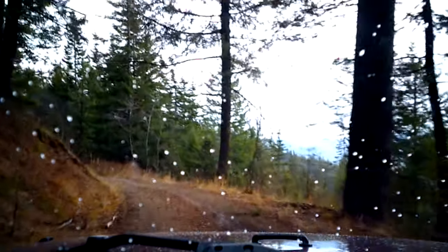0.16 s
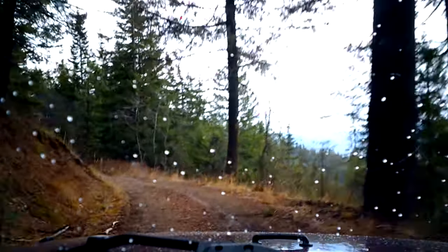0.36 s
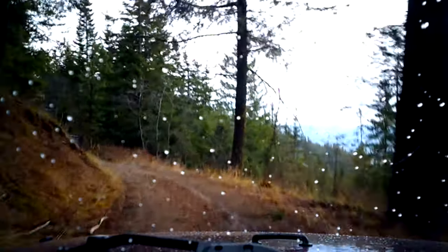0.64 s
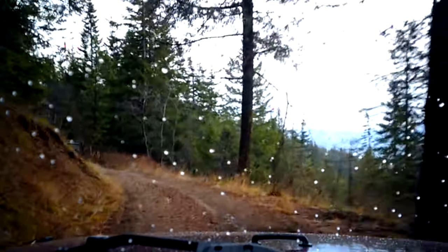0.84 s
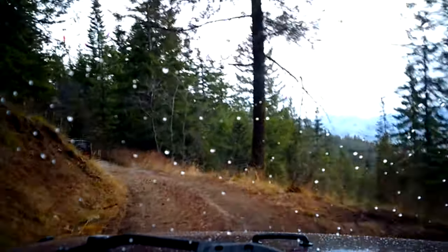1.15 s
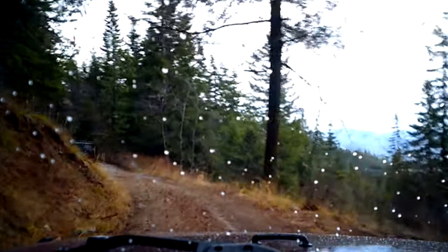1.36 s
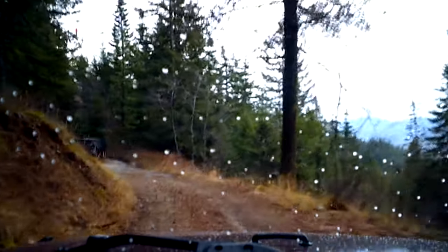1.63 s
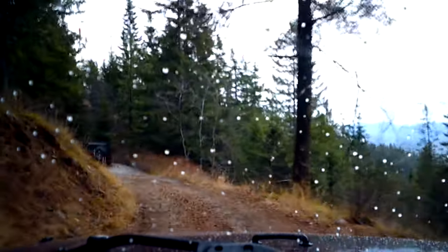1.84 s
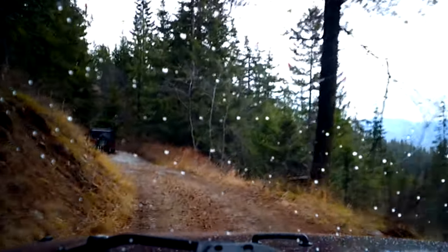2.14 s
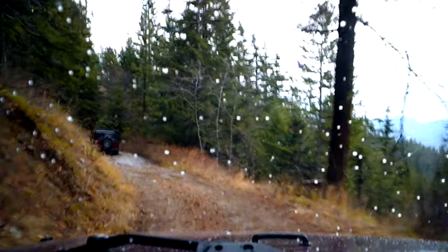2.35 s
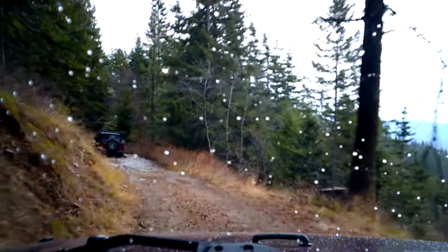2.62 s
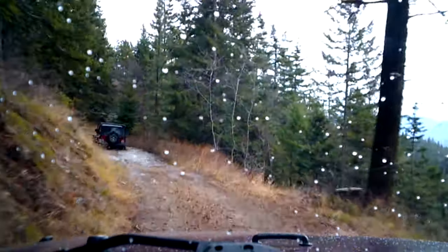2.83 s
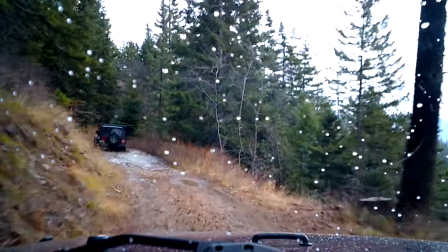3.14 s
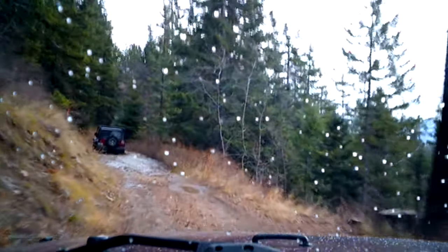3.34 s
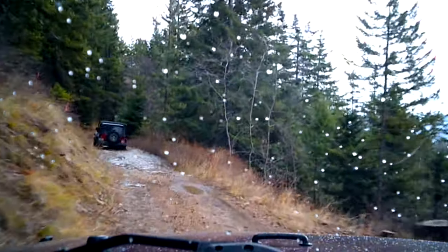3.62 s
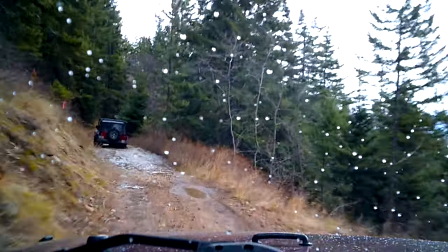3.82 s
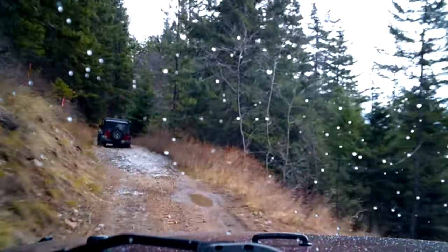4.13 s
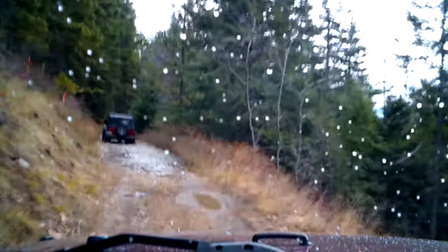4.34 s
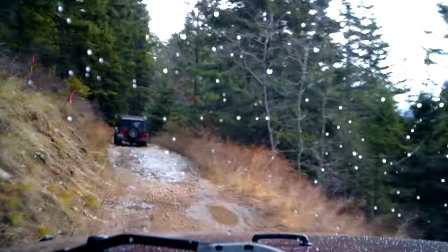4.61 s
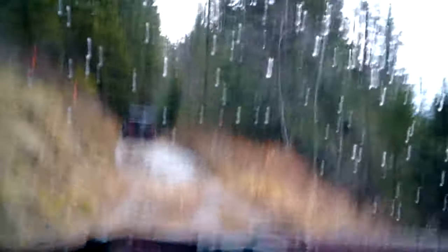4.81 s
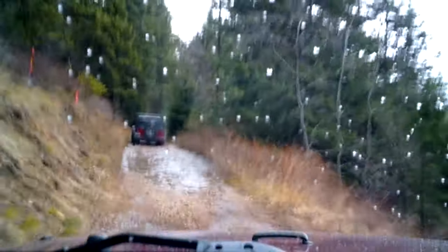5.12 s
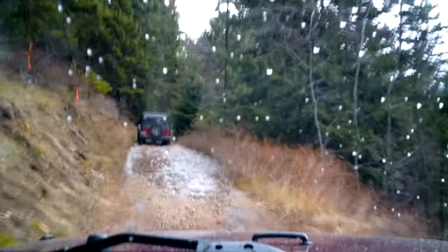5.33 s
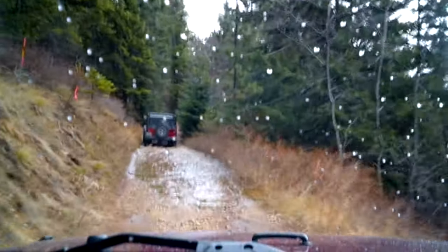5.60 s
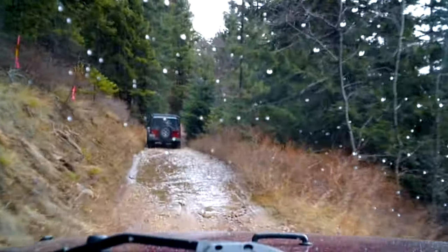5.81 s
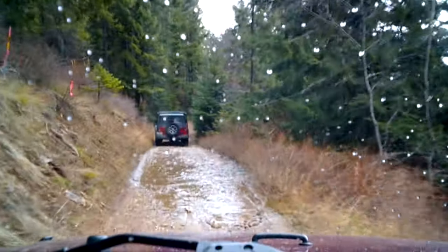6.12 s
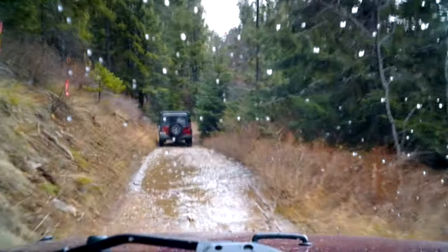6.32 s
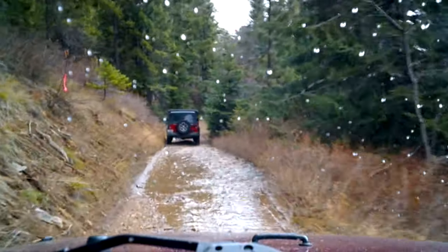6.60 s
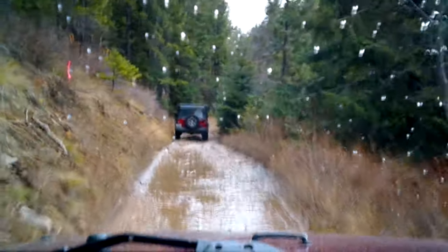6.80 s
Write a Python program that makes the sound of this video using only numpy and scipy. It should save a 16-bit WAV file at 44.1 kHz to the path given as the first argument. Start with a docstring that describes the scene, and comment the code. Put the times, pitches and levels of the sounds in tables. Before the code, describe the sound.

Close, boxy, distorted cab sound from a small camera microphone: wavering sub-bass throbs, muffled rolling rumble, dry plastic knocks and brief metallic rattles. Knocks come often at first, then thin out; a sharp bump comes before a half-second pile-up of violent slams and rattling. Afterwards the rumble eases, with isolated thumps and tiny irregular recorder clicks.

```python
"""Off-road car on a rough dirt trail

An off-road car crawls along, heard by a small camera inside the cab. The body booms near 22 Hz as a near sine
and overloads the recorder; tyres and engine rumble as shaped noise. Trim knocks, loose fittings rattle and buzz
as struck resonances, a thin hiss comes and goes, and the slamming axle jolts the camera and swings the body.
Now and then the recorder lets a single sample slip towards zero, at times past it."""
import sys
import numpy as np
from scipy import signal
from scipy.fft import rfft, irfft
from scipy.io import wavfile

SR = 44100
rng = np.random.default_rng(int(sys.argv[2]) if len(sys.argv) > 2 else 0)


def to_wav(s):
    """Save 16-bit WAV."""
    ch = np.atleast_2d(s).T  # columns
    pcm = np.round(np.clip(ch, -1, 1) * 32767)  # PCM
    wavfile.write(sys.argv[1], SR, pcm.astype(np.int16))


N = 306936  # length in samples, about 7 s

# roughness of the track, heard as tyre rumble, and the noise in the cab:
# (time [s], tyre level [dB], cab level [dB])
TRACK = [(0.0, -34.5, -46.5), (0.68, -34, -45.5), (0.85, -35.5, -46.5), (1.61, -31.5, -43),
         (2.05, -37, -49.5), (2.46, -38, -49), (3.08, -38.5, -49), (3.25, -35, -47.5), (3.7, -39.5, -51),
         (4.65, -33.5, -47), (4.81, -22.5, -29), (4.92, -19.5, -35.5), (5.25, -36, -50), (5.46, -40, -47.5),
         (5.76, -31.5, -45), (6.28, -40.5, -49), (6.69, -34, -44), (6.96, -36, -46.5)]
TRACK_REFERENCE_DB = -36  # tyre level that counts as ordinary roughness


def amp(db):
    """Turn decibels into a gain."""
    return 10 ** (np.asarray(db) / 20)


def rms_one(x):
    """Scale a signal to an rms of 1."""
    return x / np.sqrt(np.mean(x ** 2) + 1e-20)


def in_time(rows):
    """Join the rows of a timed table with straight lines: one curve per column, a value per sample."""
    s, *columns = np.transpose(rows)
    return [np.interp(np.arange(N) / SR, s, column) for column in columns]


def drift(rate_hz):
    """Slow random wandering with a spread of 1: noise smoothed twice, faster for a higher rate."""
    step = 40  # samples between the values that are computed
    r = np.exp(-2 * np.pi * rate_hz * step / SR)
    noise = rng.standard_normal(N // step + 2002)
    slow = signal.lfilter([1], [1, -2 * r, r * r], noise)[2000:]  # drop the filter's start
    return np.interp(np.arange(N) / step, np.arange(len(slow)), rms_one(slow))


def coloured(spectrum):
    """Noise with the given spectrum, scaled to an rms of 1; nearly silent outside the table's ends."""
    hz = np.fft.rfftfreq(N, 1 / SR) + 1e-3  # the small offset avoids log(0)
    points = np.array(spectrum)
    shape_db = np.interp(np.log(hz), np.log(points[:, 0]), points[:, 1], left=-90, right=-90)
    white = rfft(rng.standard_normal(N))
    return rms_one(irfft(white * amp(shape_db), N))


def ring_settings(hz, t60_s):
    """A decaying sine as a filter: its start gain and feedback, falling by 60 dB in t60_s."""
    r, w = amp(-60 / (t60_s * SR)), 2 * np.pi * hz / SR
    return np.sin(w), [1, -2 * r * np.cos(w), r * r]


def pulses(s, level_db):
    """One single-sample click per event, over a tiny floor that keeps the filters off exact zero."""
    push = np.full(N, 1e-18)
    push[np.round(s * SR).astype(int)] = amp(level_db)
    return push


def slap(push, edge_hz, back_s):
    """A sudden step that creeps back with time constant back_s, its edge softened above edge_hz."""
    step = signal.lfilter([1], [1, -np.exp(-1 / (back_s * SR))], push)
    return signal.sosfilt(signal.butter(2, edge_hz, fs=SR, output="sos"), step)


def strike(times, level_db, modes, vary_db, contact_s, clean):
    """Each blow, a click plus a rough contact that swells and fades, rings every mode at its own strength."""
    at, out = np.round(np.asarray(times) * SR).astype(int), np.zeros(N)
    vary = rng.normal(0, vary_db, (len(at), len(modes)))
    signs = rng.choice([-1, 1], (len(at), len(modes)))
    fade = np.exp(-1 / (contact_s * SR))
    swell = fade ** 5.1  # the contact swells 5.1 times faster than it fades
    envelope_feedback = np.convolve([1, -fade], [1, -swell])
    for k, (hz, mode_db, t60_s) in enumerate(modes):
        push = np.full(N, 1e-18)
        push[at] = amp(level_db + mode_db + vary[:, k]) * signs[:, k]
        envelope = signal.lfilter([1 - swell], envelope_feedback, push) * np.sqrt(1 - fade ** 2)
        blow = clean * push + envelope * rng.standard_normal(N)
        gain, feedback = ring_settings(hz, t60_s)
        out += signal.lfilter([0, gain], feedback, blow)
    return out


def boom():
    """The body's lowest resonance, a near sine of moving pitch and level, while the axle swings free."""
    # body boom before and after the main run of slams, two lists: (time [s], pitch [Hz], level [dB])
    before_and_after = [
        [(0.0, 22, -2.5), (0.09, 22.9, -30), (0.18, 22.6, -17.5), (0.27, 19.7, -30), (0.42, 24, -10.5),
         (0.51, 23.7, -28), (0.64, 21.5, -7.5), (0.7, 24, -15.5), (0.82, 20.8, -12), (1.15, 25.4, -8.5),
         (1.3, 22.9, -9), (1.36, 21.8, -23.5), (1.5, 19.5, -13), (1.6, 19.3, -28.5), (1.8, 21.4, -9.5),
         (1.86, 21.6, -18.5), (2.0, 22.5, -6.5), (2.17, 21.6, -20), (2.24, 21.8, -8.5), (2.31, 21.5, -14),
         (2.45, 20.8, -4), (2.72, 21.1, -18), (2.83, 21.2, -42), (3.09, 22.9, -9.5), (3.22, 22, -20),
         (3.3, 23.4, -5), (3.45, 22, -15), (3.53, 23, -8), (3.62, 22, -20), (3.7, 20.7, -9.5),
         (3.91, 19.4, -13.5), (4.12, 20.8, -14.5), (4.26, 21, -19), (4.52, 21.6, -8), (4.66, 22.5, -13)],
        [(5.14, 25, -26.5), (5.33, 23.6, -11), (5.5, 22.5, -36), (5.7, 20.3, -5.5), (5.79, 23, -4.5),
         (5.92, 21.3, -9.5), (6.06, 21.6, -6), (6.25, 22, -20.5), (6.62, 20.3, -12), (6.76, 19.7, -17.5),
         (6.81, 19.6, -9.5), (6.96, 20, -12.5)],
    ]
    # in between the slams take over the swing: (time [s], pitch [Hz], level [dB])
    during_slams = [(4.7, 22, -40), (5.1, 22, -40)]
    hz, level_db = in_time(np.vstack([before_and_after[0], during_slams, before_and_after[1]]))
    phase = 2 * np.pi * np.cumsum(hz) / SR
    return np.sqrt(2) * amp(level_db) * np.sin(phase)  # sqrt(2) makes the level an rms level


def roughness():
    """How far the track is rougher than ordinary, in dB."""
    return in_time(TRACK)[0] - TRACK_REFERENCE_DB


def road():
    """Three layers of rolling noise; stones make the upper two lumpy, partly in step."""
    # spectra of the deep rumble, the tyres and the cab: (frequency [Hz], relative level per Hz [dB])
    deep_colour = [(5, -26.5), (10, -3.5), (18, 6), (30, -6.5), (45, -3.5), (60, -14.5), (85, -33)]
    tyre_colour = [(32, -35), (55, -8), (97, -13), (173, -24.5), (350, -30.5), (460, -61.5), (770, -120)]
    cab_colour = [(150, -7), (250, -4.5), (426, -7), (539, -5.5), (655, -10.5), (1050, -11), (1470, -13.5),
                  (2060, -25), (2570, -32), (3120, -34), (4210, -27.5), (4790, -32.5), (5600, -53.5),
                  (7280, -58), (12300, -120)]
    t = np.arange(N) / SR
    tyre_db, cab_db = in_time(TRACK)
    # the deep layer follows a quarter of the roughness and sags by 0.3 dB per second
    deep_db = -19 + 0.25 * roughness() + 3.0 * drift(5) - 0.3 * t
    lumps = drift(9.5)  # shared by tyres and cab
    deep = amp(deep_db) * coloured(deep_colour)
    tyres = amp(tyre_db + 2.5 * lumps + 0.53 * drift(25)) * coloured(tyre_colour)
    cab = amp(cab_db + 2.2 * lumps + 1.6 * drift(60)) * coloured(cab_colour)
    return deep + tyres + cab


def chatter():
    """Each bout is a run of light touches with uneven gaps and strengths, as rows like the loud rattles."""
    # bouts of chatter from loose fittings: (start [s], length [s], mean strength [dB])
    bouts = [(0.01, .27, -48), (0.458, .2, -48.5), (0.741, .21, -49), (1.028, .2, -51.5), (1.398, .35, -47),
             (1.782, .18, -45), (2.057, .12, -49.5), (2.269, .08, -45), (2.441, .04, -44),
             (2.591, .05, -47), (2.81, .03, -44.5), (3.019, .04, -44), (3.122, .2, -47.5),
             (3.571, .19, -49), (3.852, .22, -49.5), (4.132, .21, -42), (4.38, .1, -47),
             (4.601, .57, -40.5), (5.27, .07, -44), (5.481, .11, -41), (5.934, .11, -43.5),
             (6.132, .14, -48), (6.413, .09, -46), (6.761, .07, -37)]
    mean_gap_s, spread_db = 0.017, 3.0
    rows = []
    for start, length, mean_db in bouts:
        gaps, sizes = rng.uniform(0.4, 1.6, 60), rng.standard_normal(60)
        s = mean_gap_s * (np.cumsum(gaps) - gaps[0])
        rows += list(zip(start + s[s <= length], mean_db + spread_db * sizes))
    return rows


def fittings():
    """Loose fittings ring when hit: clear rattles over a fine, clumped buzz of small contacts."""
    # loud hits: (time [s], strength [dB])
    loud_hits = [(0.503, -38), (0.661, -40.5), (1.141, -40.5), (1.237, -38.5), (1.356, -36.5), (1.422, -42),
                 (1.569, -40.5), (1.592, -38), (1.649, -40), (1.713, -39), (3.283, -40), (4.16, -40),
                 (4.171, -29), (4.177, -28), (4.191, -34.5), (4.294, -42), (4.656, -23.5), (4.677, -38),
                 (4.715, -23.5), (4.736, -22), (4.751, -26), (4.759, -19.5), (4.775, -13.5), (4.793, -25.5),
                 (4.806, -26), (4.814, -21), (4.842, -27), (4.863, -21), (4.882, -28), (4.907, -23.5),
                 (4.95, -25.5), (4.964, -21.5), (4.973, -27), (4.998, -22), (5.018, -28), (5.053, -24),
                 (5.087, -29), (5.136, -34), (5.166, -43), (5.254, -29), (5.262, -30.5), (5.505, -35),
                 (5.567, -37.5), (5.639, -34.5), (5.849, -30), (5.859, -32), (5.921, -29), (5.951, -39),
                 (6.079, -39), (6.254, -31), (6.261, -29), (6.72, -28), (6.728, -28), (6.741, -31),
                 (6.762, -35), (6.836, -35), (6.866, -36)]
    # ringing of the fittings: (frequency [Hz], level [dB], time to fall by 60 dB [s])
    fitting_modes = [(2550, -3.5, 0.0088), (3140, 1.5, 0.012), (3455, -1.5, 0.019), (3706, -4, .015),
                     (4096, -3, 0.012), (4570, -9, 0.011), (5070, -15.5, 0.015)]
    s, hit_db = np.transpose(loud_hits + chatter())
    # each contact starts slightly early because it needs time to swell
    clear = strike(s - 0.0008, hit_db - 5, fitting_modes, vary_db=4.0, contact_s=0.0025, clean=0.69)
    contacts_per_s = 150 * amp(3 * drift(10))  # wanders, so the contacts clump
    small = np.flatnonzero(rng.random(N) < contacts_per_s / SR)
    sizes_db = 4.0 * np.minimum(rng.exponential(1, N), 2)[small]
    buzz = strike(small / SR, sizes_db, fitting_modes, vary_db=2.0, contact_s=0.0011, clean=0.37)
    buzz_db = -65 + 0.69 * roughness()
    return clear + amp(buzz_db) * rms_one(buzz)


def small_knocks():
    """Faint knocks scattered at random moments, as rows like the loud ones."""
    # mean of the faint knocks: (strength [dB], brightness [dB], thud [dB], crunch [dB])
    mean_knock = (-39, -10.5, -33.5, -45.5)
    count, spread_db = 14, 5
    chance = rng.standard_normal((count, len(mean_knock)))
    s = rng.uniform(0, 0.99 * N / SR, count)
    return np.column_stack([s, np.array(mean_knock) + spread_db * chance])


def knocks():
    """Trim panels and floor pan struck on the bumps: dry crack, ringing, thud and a longer crunch."""
    # trim knocking: (time [s], strength [dB], brightness [dB], thud [dB], crunch [dB])
    loud_knocks = [(0.037, -23.5, -5, -18.5, -48), (0.108, -35, 9, -40, -38), (0.219, -38, -2, -36.5, -45),
                   (0.414, -19, -5, -38, -29), (0.497, -31.5, -3, -30, -43), (0.528, -21.5, -22, -44, -42),
                   (0.601, -34, -1, -32, -36.5), (0.689, -20.5, -6, -19.5, -36),
                   (0.87, -33, -11.5, -28, -51), (0.948, -32.5, 15, -31, -44), (1.064, -24, -9, -30, -32),
                   (1.166, -32, -3, -23.5, -38.5), (1.253, -31, -14, -31, -46),
                   (1.321, -26, -16.5, -40, -46), (1.353, -9.5, -16.5, -41, -21.5),
                   (1.428, -31, -13, -21.5, -44), (1.641, -18.5, -14, -21, -47.5),
                   (1.697, -17, -10.5, -18, -36), (1.716, -23.5, -14.5, -27, -36),
                   (1.743, -40, -11, -25.5, -36.5), (1.788, -32.5, -22, -20.5, -38),
                   (1.943, -37, 14, -36, -41), (1.987, -21.5, -16, -31, -33.5), (2.112, -31, -29, -26, -45),
                   (2.288, -33, -14, -28, -43), (2.336, -28, -20, -20, -48), (2.402, -29.5, -12, -37, -40),
                   (2.611, -24.5, -7, -40, -40), (2.767, -28.5, -27, -27, -44.6),
                   (3.276, -16, -27, -17, -24), (3.31, -28, -18, -21.5, -44), (3.639, -27, -18, -27, -38),
                   (3.854, -30.5, -11.5, -34.5, -40.5), (3.983, -18, -19, -24, -30.5),
                   (4.137, -28.5, -8, -45, -33.5), (4.174, -10, -9.5, -13.5, -21),
                   (4.215, -13.5, -32, -18.5, -30), (4.244, -25, -6, -19, -37.5),
                   (4.607, -44, -16, -27, -24.5), (4.621, -9, -21, -32, -24.5), (4.656, -13.5, -5, -7, -27),
                   (4.692, -30, -23, -14.5, -34), (4.708, -19, 2, -8.5, -24.5),
                   (4.732, -18, -4.5, -6.5, -33.5), (4.762, -10, 8, -4, -24.5), (4.783, -21, 6, -31, -32),
                   (4.8, -35, -16, -2, -30), (4.817, -12, 11, -3.5, -40), (4.84, -16.5, -10, -29, -24),
                   (4.863, -8, -17, -13.5, -41), (4.905, -18, 4, -20.5, -43), (4.938, -25, 2, -18.5, -26.5),
                   (4.954, -13, 21, 0.5, -33), (4.976, -28, 5, -23.5, -30.5), (5.004, -16, 3, -19, -31),
                   (5.034, -34, -26, -32, -33), (5.056, -10, -8.5, -6, -29), (5.087, -29, -20, -16.5, -43),
                   (5.105, -37, -23, -14, -33.5), (5.134, -18.5, -5, -10.5, -32),
                   (5.263, -23, 0, -14, -35.5), (5.504, -37, 2, -18.5, -45), (5.741, -33, -26, -27, -53),
                   (5.857, -16, -5, -10, -39), (5.892, -19, -27, -31, -40), (5.926, -25, -11.5, -14.5, -32),
                   (6.276, -21, -16, -26.5, -37.5), (6.451, -36, -15, -30, -47),
                   (6.725, -17, -4.5, -8, -31.5), (6.741, -23, -3.5, -33, -35), (6.761, -30, -21, -23, -40),
                   (6.815, -30, -7, -17, -50)]
    # ringing of the trim panels (dull, then bright), then of floor pan and seats:
    # (frequency [Hz], level [dB], time to fall by 60 dB [s])
    dull_modes = [(373, -4.5, 0.051), (510, -1, 0.028), (617, -3, 0.025), (681, -0.5, 0.032),
                  (754, 2, 0.021), (870, -7, 0.013)]
    bright_modes = [(1061, 1.5, 0.036), (1241, -2.5, 0.042), (1425, 5.5, 0.015), (1602, -4, 0.032),
                    (1796, -8.5, .03), (2250, -19.5, 0.03)]
    thud_modes = [(75, -4, 0.068), (105.2, 0.5, 0.057), (143.5, 2, 0.053), (192.8, -0.5, 0.065),
                  (238, 0, 0.048), (297, -3, 0.042)]
    s, knock_db, bright_db, thud_db, crunch_db = np.vstack([loud_knocks, small_knocks()]).T
    # brightness above zero weakens the dull modes, below zero the bright ones
    dull_db, sharp_db = -np.maximum(bright_db, 0), np.minimum(bright_db, 0)
    dull = strike(s, knock_db - 9 + dull_db, dull_modes, vary_db=3.0, contact_s=0.0014, clean=0.76)
    bright = strike(s, knock_db - 6.5 + sharp_db, bright_modes, vary_db=3.5, contact_s=0.0021, clean=0.86)
    # crunch as things settle: long, rough contacts without a click
    crunch = strike(s, crunch_db + 0.5 + 0.34 * dull_db, dull_modes, vary_db=3.0, contact_s=0.018, clean=0)
    crunch += strike(s, crunch_db + 0.5 + 0.52 * sharp_db, bright_modes, vary_db=1.0, contact_s=0.02, clean=0)
    thud = strike(s, thud_db - 8.0, thud_modes, vary_db=3.0, contact_s=0.0068, clean=1.0)
    crack = slap(pulses(s, knock_db - 3.0 + 0.67 * sharp_db), edge_hz=2200, back_s=0.002)
    return dull + bright + crunch + thud + crack


def thin_hiss():
    """Noise in a narrow band, fading in and out."""
    # stretches of hiss: (start [s], length [s], pitch [Hz], level [dB])
    hisses = [(0.075, 0.28, 3720, -62.5), (3.33, 0.14, 4100, -72)]
    width_hz, edge_s = 250, 0.044
    t, out = np.arange(N) / SR, np.zeros(N)
    for start, length, hz, level_db in hisses:
        band_hz = [hz - width_hz / 2, hz + width_hz / 2]
        band = signal.butter(1, band_hz, "band", fs=SR, output="sos")
        shape = np.clip(np.minimum(t - start, start + length - t) / edge_s, 0, 1)
        noise = rms_one(signal.sosfilt(band, rng.standard_normal(N)))
        out += amp(level_db) * shape * noise
    return out


def slams(body):
    """The axle hits its stops: each slam jolts the camera and throws the body the same way, to ring down."""
    # axle slams: (time [s], jolt [dB], body swing [dB])
    axle_hits = [(4.178, -7, -27), (4.246, -10, -29), (4.664, -6, -4), (4.717, -5, -11), (4.768, 2, -2),
                 (4.818, 8.5, 0), (4.863, 1.5, -0.5), (4.909, -9, -1.5), (4.957, 2.5, -9),
                 (5.003, 0.5, -4.5), (5.058, 1, -7.5), (5.264, -6.5, -33), (5.859, -5, -27),
                 (6.728, -7.5, -38)]
    s, jolt_db, swing_db = np.transpose(axle_hits)
    # the push is downwards, or upwards where the boom is well below zero
    way = np.ones(N)
    way[body < -0.2] = -1
    gain, feedback = ring_settings(hz=21.47, t60_s=0.27)
    swing = signal.lfilter([0, -gain], feedback, way * pulses(s, swing_db))
    jolt = slap(way * pulses(s, jolt_db), edge_hz=1470, back_s=0.0084)
    return swing - jolt


def scene():
    """Everything in the cab, one channel; the microphone passes no steady pressure."""
    body = boom()
    cab = body + road() + fittings() + knocks() + thin_hiss() + slams(body)
    no_steady = signal.butter(1, 4, "high", fs=SR, output="sos")
    return signal.sosfilt(no_steady, cab)[None, :]


def record(dry):
    """Hard overload, a narrow-band sound path, slipped samples, then the top is cut."""
    # bursts of slipped samples: (start [s], list with the size of each slip [dB])
    slip_bursts = [(0.0276, [-7.5]), (0.336, [-11.5, -13.5, -21.5, -12]), (0.8499, [-20, -15, -8.5, -14.5]),
                   (1.3638, [-29.5, -38, -11.5, -30]), (1.8776, [-29, -44, -11.5, -22, -26.5]),
                   (2.3915, [-5, -3, -7, -9, -14]), (2.974, [-10.5, -17.5, -9, -12.5]),
                   (3.4877, [-9.5, -12, -24.5, -13]), (4.0018, [-20, -9.5, -19, -33]),
                   (4.5157, [-7, -9.5, -13.5, -16.5]), (5.098, [-10, -25.5, -14.5]),
                   (5.5433, [-31.5, -12.5, -5, -3, -3]), (6.1256, [-7.5, -8.5, -11, -15]),
                   (6.6397, [-6.5, -30, -23, -8])]
    overload, slip_gap_s = 0.7, 0.06851  # largest sample value; even pace within a burst
    flat = np.clip(dry, -overload, overload)
    narrow = signal.sosfilt(signal.butter(8, 5210, fs=SR, output="sos"), flat)
    out = narrow + amp(-15.5) * (flat - narrow)  # a little of the overload's edge passes
    slips = []
    for start, sizes in slip_bursts:
        slips += [(start + k * slip_gap_s, db) for k, db in enumerate(sizes)]
    s, size_db = np.transpose(slips)
    at = np.round(s * SR).astype(int)
    out[0, at] -= np.sign(out[0, at]) * amp(size_db)
    top_cut = signal.cheby2(10, 25, 16800, fs=SR, output="sos")
    return signal.sosfiltfilt(top_cut, out)  # run forwards and backwards


dry = scene()
out = record(dry)
to_wav(out)
```